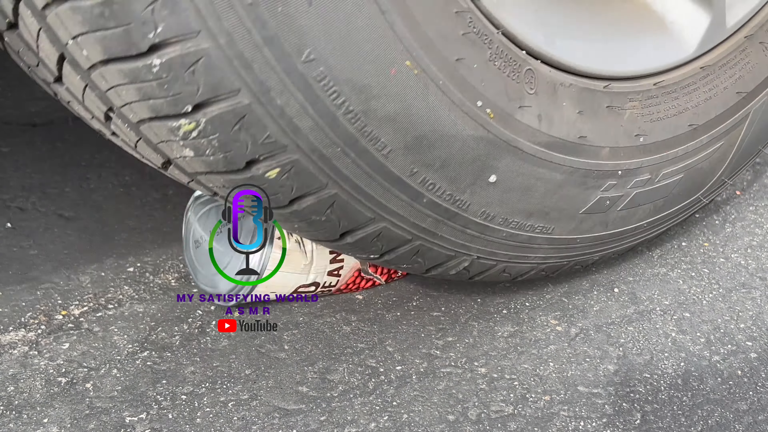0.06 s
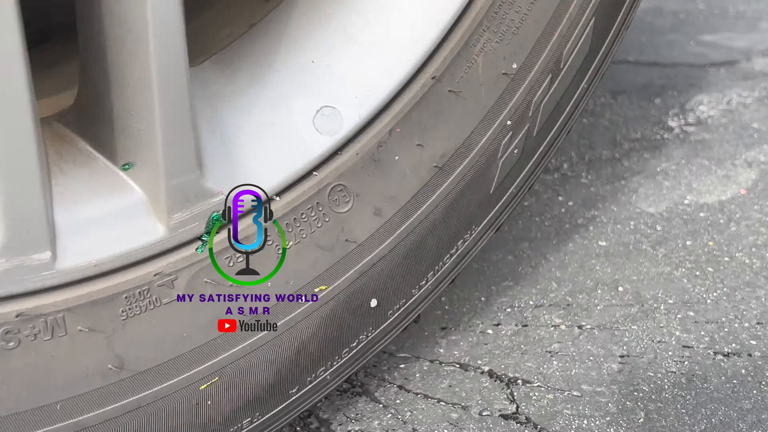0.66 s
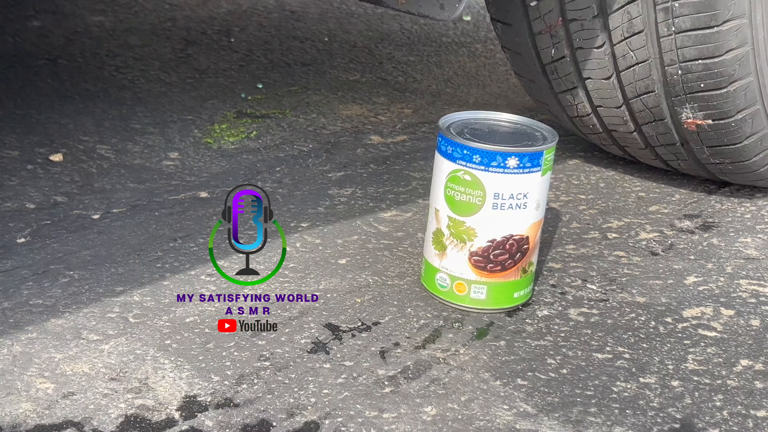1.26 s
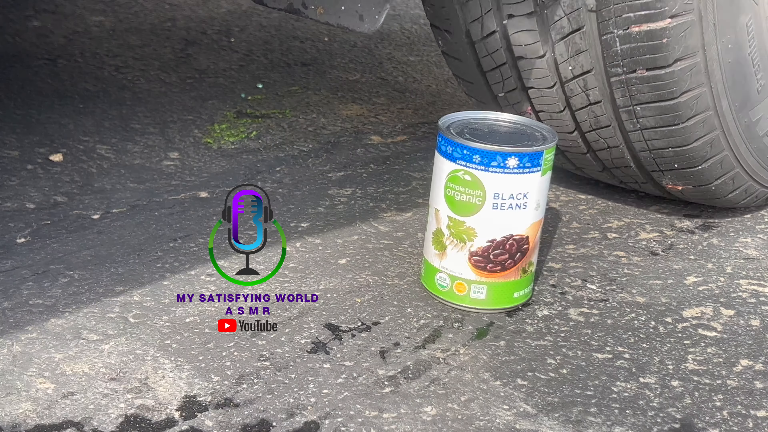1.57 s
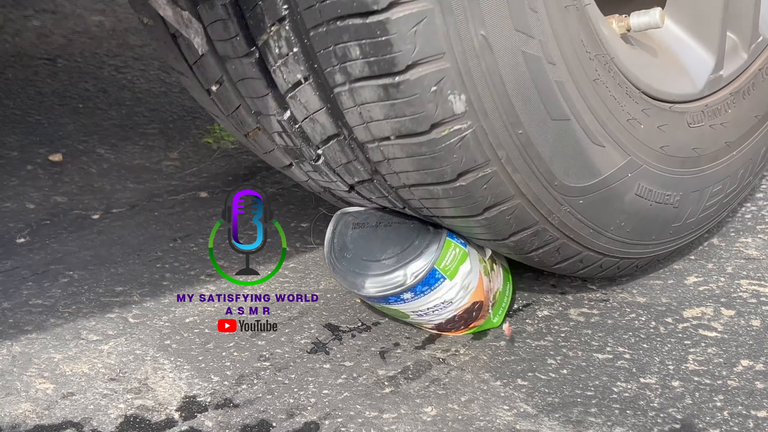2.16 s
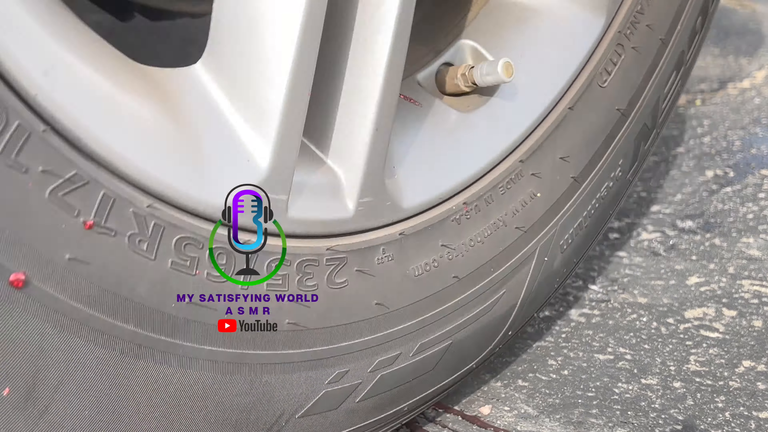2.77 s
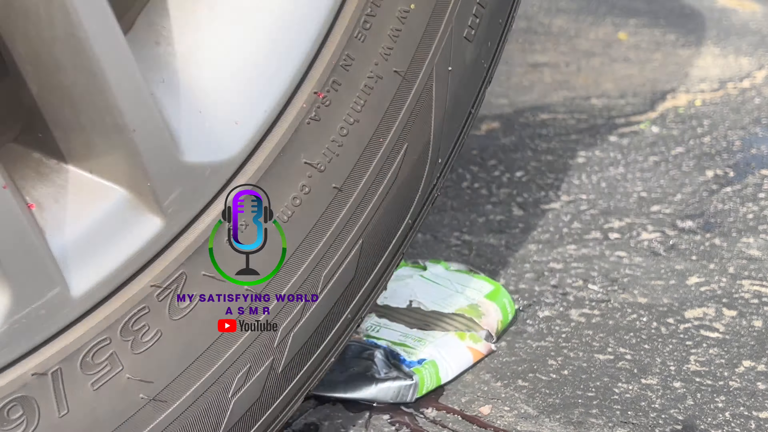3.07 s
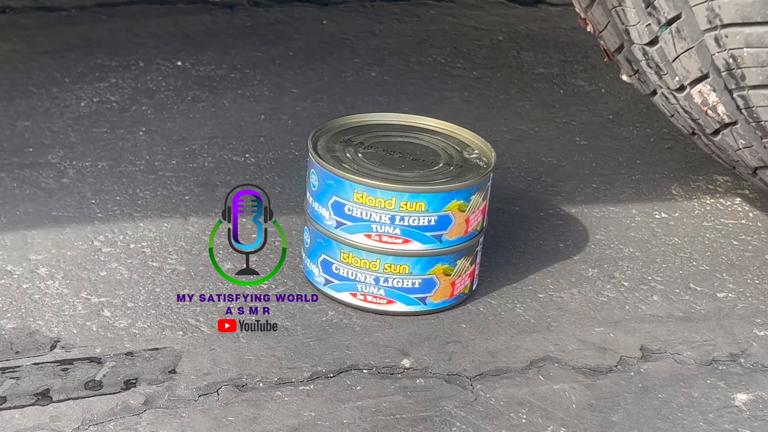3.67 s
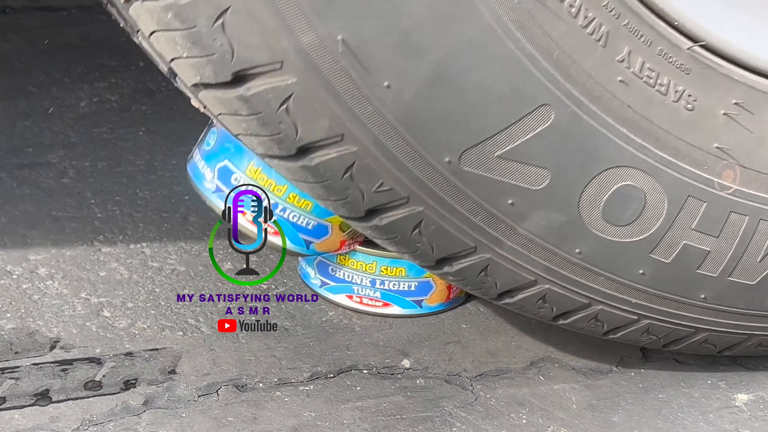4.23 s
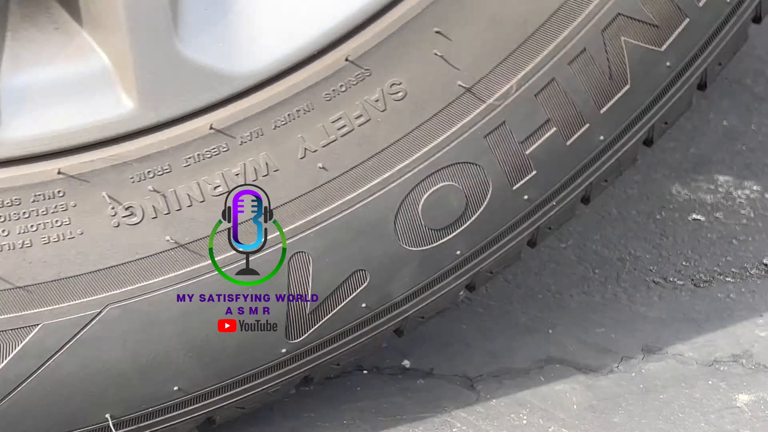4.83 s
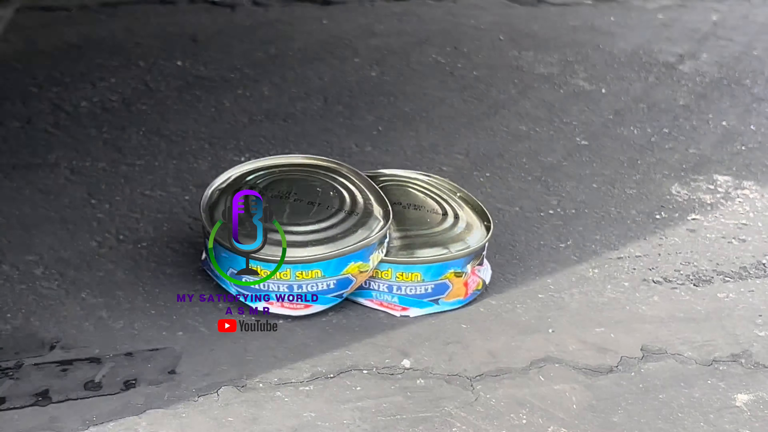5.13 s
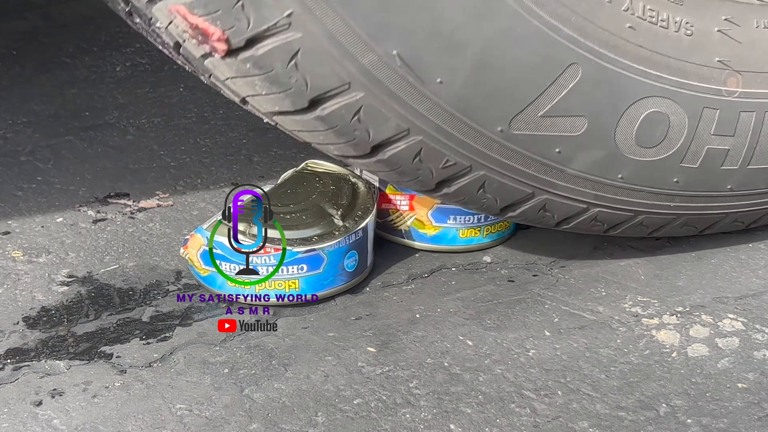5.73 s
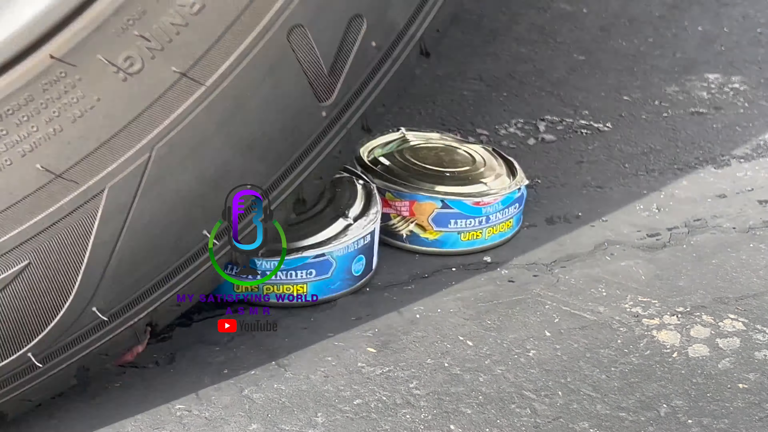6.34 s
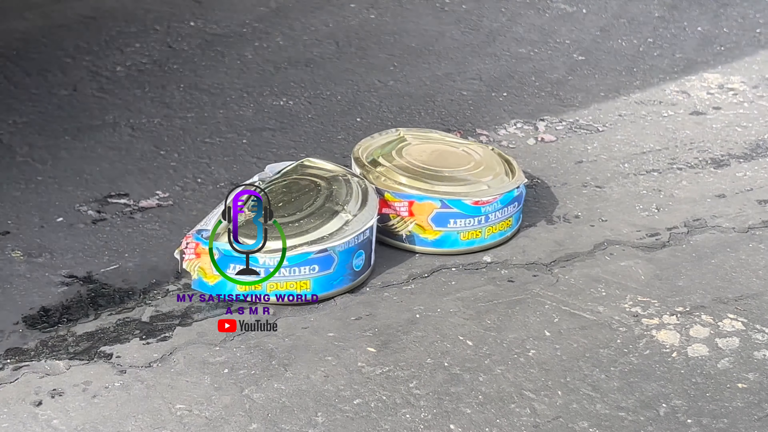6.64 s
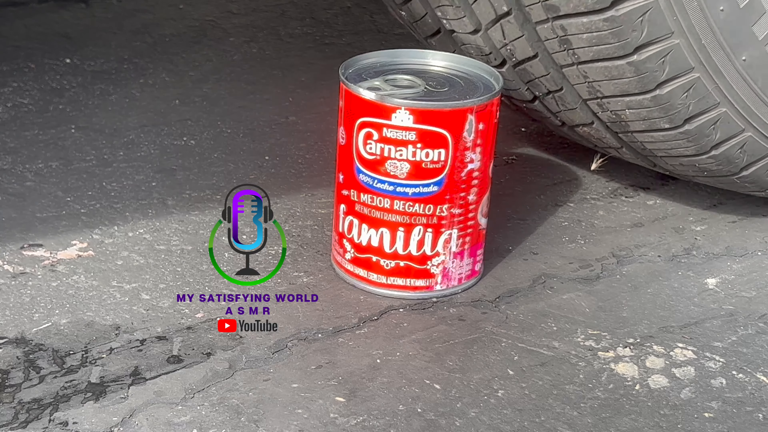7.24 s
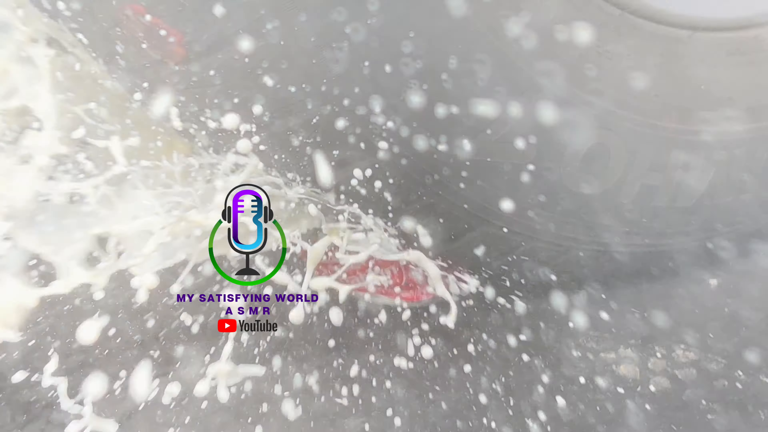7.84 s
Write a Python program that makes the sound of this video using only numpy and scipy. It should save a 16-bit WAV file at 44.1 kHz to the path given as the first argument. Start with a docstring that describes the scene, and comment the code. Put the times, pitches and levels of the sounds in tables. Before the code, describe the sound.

A car creeps over food tins on asphalt, close to the microphone. Five crushes follow one another with short lulls between them: a spitting crunch, a few low thumps, loud hollow knocks, lighter crackling, and finally a hard pop and an overloaded burst of spray. Grit ticks under the tread, the tyre hums faintly after each jolt, and the idling engine and outdoor air swell around every crush.

```python
"""Food tins crush under a creeping car, close to the microphone: their walls buckle with short hollow
knocks, and their seams burst, thump the microphone with air and spray their contents.
Each jolt rings the air inside the tyre, and grit ticks between tread and asphalt.
Behind them the idling engine and the outdoor air swell around each crush and duck under loud cracks.
The loudest bursts overload and flatten."""
import sys
import numpy as np
from scipy import signal
from scipy.fft import rfft, irfft
from scipy.io import wavfile
from scipy.ndimage import uniform_filter1d

SR = 44100
rng = np.random.default_rng(int(sys.argv[2]) if len(sys.argv) > 2 else 0)


def digitize_waveform(pressure):
    """Quantize a signal to 16-bit integers and store it at the path in sys.argv[1].

    Rows of a 2-D input are taken as channels; values are limited to [-1, 1].
    """
    field = np.atleast_2d(pressure).T
    bounded = np.clip(field, -1, 1)
    quanta = np.round(bounded * 32767).astype(np.int16)
    wavfile.write(sys.argv[1], SR, quanta)


N = 348390
T = np.arange(N) / SR


def amp(db):
    """Decibels to gain."""
    return 10 ** (np.asarray(db) / 20)


def unit(x):
    """Scales to rms 1."""
    return x / np.sqrt(np.mean(x ** 2) + 1e-20)


def curve(points, hz):
    """Reads a curve on a log-frequency axis."""
    f, value = np.transpose(points)
    return np.interp(np.log(hz + 1), np.log(f + 1), value)


def add(mix, start, sound):
    """Mixes a stereo sound in at a start time in seconds."""
    part = mix[:, max(round(start * SR), 0):][:, :sound.shape[1]]
    part += sound[:, :part.shape[1]]


def fade(t, t60):
    """Exponential decay, 60 dB down after t60 seconds."""
    return np.exp(-np.log(1000) * t / max(t60, 1e-3))


def pan(db):
    """Left and right gains of constant total power; positive dB leans left."""
    return unit(amp([[db / 2], [-db / 2]]))


def noise(size, colour, likeness):
    """Stereo noise of rms 1 with a dB spectrum colour(hz) and a left-right likeness."""
    hz = np.fft.rfftfreq(size, 1 / SR)
    left, other = rfft(rng.standard_normal((2, size)))
    shared = np.clip(likeness(hz) if callable(likeness) else likeness, 0, 1)
    right = shared * left + np.sqrt(1 - shared ** 2) * other
    return unit(irfft(np.array([left, right]) * amp(colour(hz)), size))


def hump(centre_hz, below_db, above_db):
    """A spectrum with one slope per octave below its centre and another above."""
    def colour(hz):
        octaves = np.log2((hz + 1) / centre_hz)
        return np.where(octaves < 0, below_db * octaves, above_db * octaves)
    return colour


def wander(size, rate_hz):
    """Smooth random modulation of rms 1."""
    hz = np.fft.rfftfreq(size, 1 / SR)
    return unit(irfft(rfft(rng.standard_normal(size)) / (1 + (hz / rate_hz) ** 4), size))


def underbody(sound, wet_db, t60, likeness, size=6000):
    """Adds the quick echoes between the asphalt and the underside of the car."""
    t = np.arange(size) / SR
    echoes = noise(size, np.zeros_like, likeness) * fade(t, t60) * np.clip(t / 0.0015 - .5, 0, 1)
    echoes *= amp(wet_db) / np.linalg.norm(echoes[0])
    echoes[:, 0] += 1  # the direct sound
    return signal.fftconvolve(sound, echoes, axes=1)


# Stereo image of the noise beds. Each row: frequency in Hz, left-right likeness (0 or less is widest).
BED_LIKENESS = [(60, 0.55), (130, 0.46), (290, 0.66), (640, 0.47), (1410, 0.62), (3100, 0.54), (6820, 0.11),
                (15000, -0.31)]
def bed(spectrum):
    """Steady background noise, widest in the treble."""
    return noise(N, lambda f: curve(spectrum, f), lambda f: curve(BED_LIKENESS, f))


# Tone of the outdoor wash and of the far hiss. Each row: frequency in Hz, relative level in dB.
WASH_EQ = [(80, -67), (250, 3), (450, 4), (700, 2), (1000, 1.5), (1600, -6.5), (2500, -16), (5000, -17.5),
           (9000, -20), (16000, -24.5)]
HISS_EQ = [(400, 11.5), (1200, 8.5), (2200, 7), (3500, 3.5), (6000, 0.5), (8500, -6), (12000, -12.5),
           (16000, -23)]
# The hiss holds one level after another. Each row: start in seconds, level in dB before the swells.
HISS_STEPS = [(0, -54), (1.233, -66.5), (3.569, -51.5), (6.88, -50)]
def outdoor_air(gain):
    """A fluttering midrange wash, and a far hiss that follows the swells a little less."""
    wash, hiss = bed(WASH_EQ), bed(HISS_EQ)
    wash_db = -52.5 + 2.1 * wander(N, 25)
    starts, levels_db = np.transpose(HISS_STEPS)
    hiss_db = levels_db[np.searchsorted(starts[1:], T)]
    return gain * amp(wash_db) * wash + gain ** 0.9 * amp(hiss_db) * hiss


# Tone of the engine and tyre rumble. Each row: frequency in Hz, relative level in dB.
RUMBLE_EQ = [(10, -23.5), (28, 0.5), (55, -2.5), (90, 0), (140, -3.5), (230, -9.5), (350, -20.5),
             (800, -66)]
def engine(firing_hz=27.4, level_db=-40.5):
    """The idle: harmonics of a slightly drifting firing rate over a low rumble."""
    turns = np.cumsum(firing_hz * (1 + 0.01483 * wander(N, 2.28))) / SR
    firing = sum(amp(db) * np.sqrt(2) * np.sin(2 * np.pi * (harmonic * turns + rng.random()))
                 for harmonic, db in [(1, -13.5), (2, -14), (3, -17), (5, -22)])
    return amp(level_db) * (firing + amp(-3.0) * bed(RUMBLE_EQ))


def grit(level_db=-56.5, grains_per_s=47, size=700):
    """Sparse sand grains crushed under the rolling tread, each clicking in one of eight bands."""
    clicks = (rng.random(N) < grains_per_s / SR) * amp(1.99 * np.minimum(rng.exponential(1, N), 3.5))
    band, out = rng.integers(0, 8, N), np.zeros((2, N))
    for k, hz in enumerate(np.geomspace(900, 12000, 8)):
        grain = noise(size, hump(hz, 13.0, -15), 0.36) * fade(np.arange(size) / SR, 0.0082)
        out += signal.oaconvolve((clicks * (band == k))[None], grain, axes=1)[:, :N]
    return amp(level_db) * out


# The tyre drops off a collapsing tin. Each row: start in seconds, level in dB before the swells.
JOLTS = [(0, -55), (0.295, -39.5), (1.8, -51.5), (4.05, -39.5), (4.29, -36), (4.8, -70), (7.425, -40),
         (7.758, -27)]
def tyre(cavity_hz=202.6, rise_s=0.013, t60=2.33, rolling_db=-62):
    """The air inside the tyre hums at its lowest mode after every jolt, wavering under the load."""
    power = amp(rolling_db) ** 2
    for start, db in JOLTS:
        since = np.maximum(T - start, 0)
        power = power + (amp(db) * np.minimum(since / rise_s, 1) * fade(since, t60)) ** 2
    turns = np.cumsum(cavity_hz * (1 + .012 * wander(N, 16))) / SR
    waver_db = 2.6 * wander(N, 14)
    return np.sqrt(2 * power) * amp(waver_db) * np.sin(2 * np.pi * turns) * pan(-1.8)


# Fader moves on the background. Each row: start in seconds, end in seconds, boost in dB before ducking.
SWELLS = [(-.1, 1.24, 9), (1.707, 2.751, 14.5), (3.876, 4.929, 17.5), (5.542, 6.322, 10), (7.379, 8.0, 16)]
def background_gain(tins, threshold_db=-15.5, duck_share=.62, release_db_per_s=7):
    """The background steps up around each crush; while raised, it ducks under loud tins and creeps back."""
    boost_db = sum(db * ((T > start) & (T < end)) for start, end, db in SWELLS)
    tins_power = uniform_filter1d((tins ** 2).mean(0), size=64)
    over_db = np.maximum(10 * np.log10(np.clip(tins_power, 1e-12, 1)) - threshold_db, 0)
    release_db = release_db_per_s * T
    duck_db = np.maximum.accumulate(duck_share * over_db + release_db) - release_db
    return amp(uniform_filter1d(np.maximum(boost_db - duck_db, 0), size=256))


# The loudest ticks of grit and splitting seams. Each row: start in seconds, level in dB.
TICKS = [(0.028, -15.5), (0.341, -12), (0.597, -20), (4.023, -14), (4.424, -29), (4.474, -21),
         (4.532, -23.5), (4.571, -21), (4.611, -20), (4.674, -24.5), (4.757, -22), (4.798, -17.5),
         (4.920, -17), (5.012, -34), (5.042, -27), (5.075, -31.5), (5.728, -17.5), (6.068, -13.5),
         (6.1, -18), (6.1556, -11.5), (7.625, -7.5), (7.698, -12.5), (7.742, -17.5)]
def ticks(centre_hz=10200, size=1024):
    """Tiny bright fractures with a short scatter of echoes."""
    out, t = np.zeros((2, N)), np.arange(size) / SR
    for start, db in TICKS:
        snap = noise(size, hump(centre_hz, 3.2, -6), .55) * fade(t, .005) * (1 - fade(t, .001))
        add(out, start, underbody(amp(db) * snap, wet_db=-5, t60=0.044, likeness=0.18))
    return out * pan(-2.8)


# Low thumps of escaping air, of the tyre settling and, last, of spray hitting the microphone.
# Each row: start in seconds, level in dB, pitch in Hz, pan in dB.
THUMPS = [(.002, -22, 93.7, 28), (0.296, -7.5, 101.3, 19), (.340, -15, 78, 15), (1.801, -8, 251, -9),
          (1.844, -16, 128.5, -13), (2.027, -11, 96, -22), (2.041, -3, 92.6, -22), (2.14, -16.5, 124, -20),
          (2.5467, -2, 105, 16.5), (4.053, -14, 181, 3), (4.140, -10, 190, -1), (4.2879, 1, 229, -2),
          (4.29, -18, 112, -1), (4.801, -12.5, 117, 24), (4.822, -12, 83.4, -3), (5.588, -18.5, 109, -4),
          (5.661, -17, 207, 2), (6.206, -20.5, 194, -2), (7.427, -3, 119, -2), (7.692, -11, 145, -14),
          (7.761, -5.5, 119.5, 2), (7.799, -6.5, 199, 6), (7.888, 6, 27.7, -1)]
def thumps(decay_cycles=16, size=16384):
    """A push of air that swings and dies; its eddies reach left and right differently."""
    out, t = np.zeros((2, N)), np.arange(size) / SR
    for start, db, hz, pan_db in THUMPS:
        swing = np.sin(2 * np.pi * hz * t)
        eddies = .25 * noise(size, hump(hz, 7, -14), .15)
        envelope = fade(t, decay_cycles / hz) * (1 - fade(t, 0.012))
        add(out, start, amp(db) * pan(pan_db) * (swing + eddies) * envelope)
    return out


# The faint ring of the whole tin. Each row: pitch in Hz, resonance gain in dB, t60 in seconds.
TIN_MODES = [(423, -8.5, 0.27), (685, -15, 0.222), (1010, -17, .12), (1144, -4, 0.067), (1185, -8.5, 0.1),
             (1310, -4, 0.073), (1950, -9, 0.19), (2555, -6, 0.037), (2690, -28, .1), (2820, -8, .08),
             (3730, -28.5, 0.34)]
def tin_ring(drive, size=8192):
    """Lightly damped modes of the tin, shaken by the driving sound."""
    t = np.arange(size) / SR
    modes = sum(amp(db) * np.sin(2 * np.pi * hz * t) * fade(t, t60) * 2 / fade(t, t60).sum()
                for hz, db, t60 in TIN_MODES)
    return signal.oaconvolve(drive, modes[None], axes=1)[:, :N]


# A seam opens and sprays. Each row: start in seconds, level in dB, attack in seconds, t60 in seconds,
# corner frequency in Hz, slope above it in dB per octave, pan in dB.
JETS = [(0.079, -26.5, 0.0011, 0.17, 1900, -7, 32), (0.296, -11.5, 0.0046, 0.19, 380, -2.5, 10),
        (0.298, -10, 0.001, 0.092, 7400, -3.5, 0.5), (0.305, -11.5, 0.0015, 0.049, 3430, -16, -5),
        (.335, -27.5, 0.003, 0.82, 1150, -2, 2.5), (0.544, -32.5, 0.0024, 0.046, 2120, -10, 16),
        (.628, -21.5, 0.0064, 0.16, 3200, -4.5, 3), (0.656, -25, 0.0035, 0.16, 1640, -7.5, 7),
        (.899, -32, 0.0011, 0.062, 1860, -5, 14), (0.926, -33.5, 0.0014, 0.18, 2010, -5.5, 7.5),
        (1.794, -26.5, 0.0014, 0.08, 1000, 0, 1), (2.013, -26, 0.026, 0.15, 1280, -7, -3.5),
        (2.138, -17.5, 0.0073, 0.093, 1180, 0.5, -1), (2.546, -13, 0.0083, 0.13, 278, -1.5, 0),
        (2.551, -32.5, 0.0035, 0.58, 1720, -3.5, -0.5), (2.843, -44.5, 0.021, 0.28, 5240, -10, 0),
        (2.885, -40, 0.043, 0.21, 1900, -3, -2), (4.043, -12, 0.001, 0.11, 540, -6, -3),
        (5.55, -33.5, 0.072, 0.59, 696, -4.5, -3.5), (5.658, -22.5, 0.00089, 0.23, 6000, 8, -2),
        (7.423, -2.5, 0.0029, 0.042, 440, -5, -2.5), (7.757, 4, 0.00058, 0.14, 605, -6, -1),
        (7.793, -16, 0.0098, 0.16, 1500, 0.5, -3.5)]
def jets(size=32768):
    """Juice and air sputter through a split seam as the pressure falls; the slit whistles faintly."""
    out, t = np.zeros((2, N)), np.arange(size) / SR
    likeness = lambda f: curve([(500, 0.7), (2500, 0.073), (10000, 0.16)], f)
    trim = lambda f: curve([(10500, -1.0), (16000, -1.5)], f)
    for start, db, attack, t60, hz, slope_db, pan_db in JETS:
        pressure = np.minimum(t / attack, 1) * fade(np.maximum(t - attack, 0), t60)
        spurts_db = 2.45 * wander(size, 160)
        drops_db = 2.6 * wander(size, 1500)
        sputter = unit(amp(spurts_db + drops_db))
        whistle = lambda f: 4 / (1 + ((f / hz - 1) / 0.046) ** 2)
        colour = lambda f: hump(hz, 5, slope_db)(f) + whistle(f) + trim(f)
        spray = noise(size, colour, likeness)
        add(out, start, amp(db) * pan(pan_db) * pressure * sputter * spray)
    return out + amp(-14.0) * tin_ring(out)


# A tin wall snaps through. Each row: start in seconds, level in dB, nominal panel pitch in Hz,
# t60 in seconds, level of the crack against the knock in dB.
SNAPS = [(0.044, -21.5, 493, 0.0076, -3.5), (0.078, -26.5, 2520, 0.017, 13.5), (.130, -28, 2200, 0.017, 9),
         (0.363, -13.5, 560, 0.0085, -9), (0.41, -15.5, 607, 0.0065, -25), (0.433, -20, 1110, 0.013, -4),
         (.437, -23.5, 1930, 0.02, -6), (0.457, -19.5, 1170, 0.0091, -5), (.475, -27, 1290, 0.029, 8.5),
         (1.804, -11, 450, 0.01, -24), (1.81, -28, 1620, 0.054, -28), (1.840, -25, 444, 0.028, -28),
         (1.925, -25, 403, 0.06, -25), (2.277, -35, 1076, 0.02, -1), (2.363, -30.5, 865, 0.024, 9.5),
         (4.049, -6, 940, 0.015, -14), (4.056, 7, 660, 0.011, -15), (4.080, -9.5, 1360, 0.012, -11),
         (4.1404, -9, 664, 0.021, -14), (4.1971, -13, 1600, 0.018, -38), (4.270, -8.5, 1830, 0.0042, -22),
         (4.2886, 2.5, 470, 0.016, -21), (4.308, -6, 1010, 0.017, -34), (4.31, -13, 1804, 0.024, -29),
         (4.448, -10.5, 467, 0.0035, -21), (4.7998, -16, 417, 0.024, -14), (5.6001, -11, 2240, 0.012, -22),
         (5.6611, -18.5, 454, 0.0092, -12), (5.697, -27.5, 730, 0.035, 8), (5.7553, -3, 2100, 0.0076, -4),
         (5.7566, -11.5, 873, 0.014, -29), (5.9125, -20.5, 673, 0.034, -3), (6.1554, -18, 1760, 0.009, 4),
         (6.2076, -19.5, 1850, 0.0071, 6.5), (6.321, -36, 600, 0.099, 13), (6.377, -31.5, 1430, 0.015, 1),
         (7.4253, 9.5, 491, 0.018, -7.5), (7.427, -10, 1410, 0.031, -24), (7.437, -11.5, 680, 0.04, -2),
         (7.487, -20, 770, 0.01, -2), (7.554, -12, 640, 0.0059, -10), (7.624, -19.5, 650, .03, -23),
         (7.665, -19.5, 1140, 0.011, -5), (7.689, -14, 418, 0.024, -13), (7.7, -17, 448, 0.023, -19),
         (7.7577, 7, 1010, 0.025, 4.5), (7.874, -13.5, 675, 0.0079, -9)]
def crumple(creases=2, within_s=.022, drop_db=13.5, fall_db_per_s=302, spread_octaves=0.79):
    """Each snap sets off smaller creases: later ones are weaker, and most ring higher."""
    chance = rng.random((len(SNAPS), creases, 2))
    for (start, db, hz, t60, crack_db), draws in zip(SNAPS, chance):
        yield start, db, hz, t60, crack_db
        for k, (when, smallness) in enumerate(draws):
            delay = within_s * (k + when) / creases
            crease_db = db - drop_db - fall_db_per_s * delay
            crease_hz = hz * 2 ** (spread_octaves * (smallness - 0.25))
            yield start + delay, crease_db, crease_hz, t60, crack_db


# Modes of a buckling panel. Each row: multiple of its pitch, level in dB, share of its ring time.
PANEL_MODES = [(0.419, -1, 0.58), (0.711, -5, 1.0), (1, 7.5, 0.64), (1.47, -14, 0.83), (2.15, -22.5, 0.99),
               (3.3, -4.5, 0.53), (4.9, -23, 0.15)]
def buckles(size=4096):
    """Each snap rings a few damped panel modes, sagging in pitch, with a crack at the crease."""
    out, t = np.zeros((2, N)), np.arange(size) / SR
    ratio, mode_db, share = np.transpose(PANEL_MODES)[:, :, None]
    for start, db, hz, t60, crack_db in crumple():
        detune = 1 + 0.056 * rng.standard_normal(ratio.shape) * (ratio != 1)  # no two dents are alike
        turns = np.cumsum(hz * (0.942 + 0.081 * fade(t, t60))) / SR
        push = 1 / (1 + (ratio * hz / 3300) ** 4)  # a snap is too slow to drive the highest modes
        modes = push * amp(mode_db) * fade(t / share, t60) * np.sin(2 * np.pi * ratio * detune * turns)
        knock = modes.sum(0) * (1 - fade(t, .0016))
        crack = noise(size, hump(1800, 8.0, -4.0), 0.68) * fade(t, 0.014) * (1 - fade(t, 0.011))
        snap = amp(db) * (knock + amp(crack_db) * crack)
        add(out, start, underbody(snap, wet_db=-11.0, t60=0.089, likeness=0.91))
    return (out + tin_ring(out)) * pan(-2.6)


# The gap between car and asphalt colours the tins. Each row: frequency in Hz, gain in dB.
GAP_EQ = [(150, -0.5), (235, -1.5), (310, -2.5), (410, -1), (1000, -0.5), (2400, 0.5), (3700, 0), (4900, 0),
          (7000, -1), (13000, -1), (16000, -7.5)]
def scene():
    """The tins heard through the gap under the car, over engine, outdoor air, grit and tyre."""
    tins = thumps() + jets() + buckles() + ticks()
    hz = np.fft.rfftfreq(2 * N, 1 / SR)
    tins = irfft(rfft(tins, 2 * N) * amp(curve(GAP_EQ, hz)))[:, :N]
    gain = background_gain(tins)
    return tins + gain * engine() + outdoor_air(gain) + gain * (grit() + tyre())


def record(dry, cutoff_hz=15900):
    """Peaks flatten at full scale, then a steep low-pass takes off the very top."""
    flattened = dry / (1 + dry ** 8) ** (1 / 8)
    lowpass = signal.firwin(401, cutoff_hz, window=("kaiser", 7), fs=SR)
    return signal.oaconvolve(flattened, lowpass[None], "same")


dry = scene()
out = record(dry)
digitize_waveform(out)
```